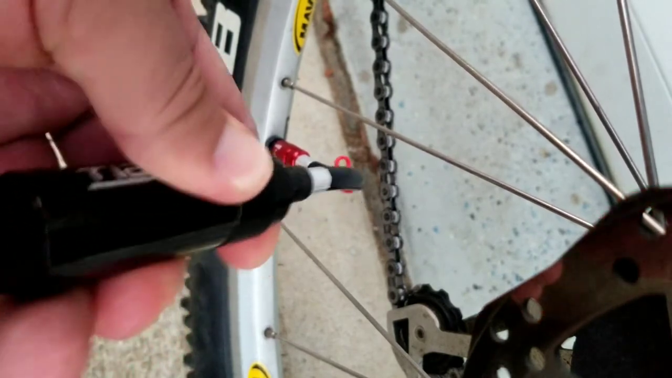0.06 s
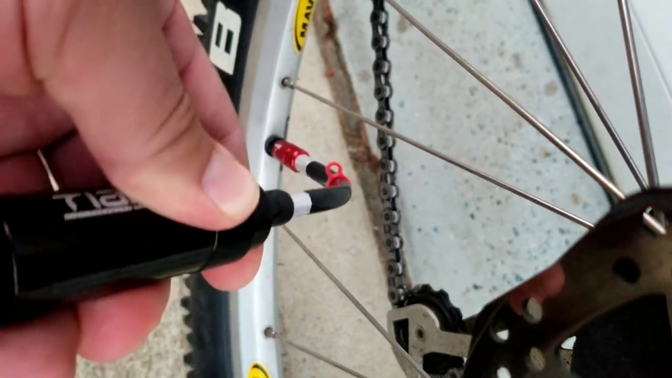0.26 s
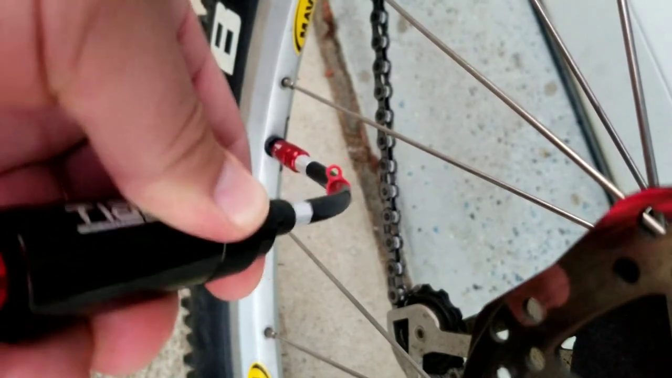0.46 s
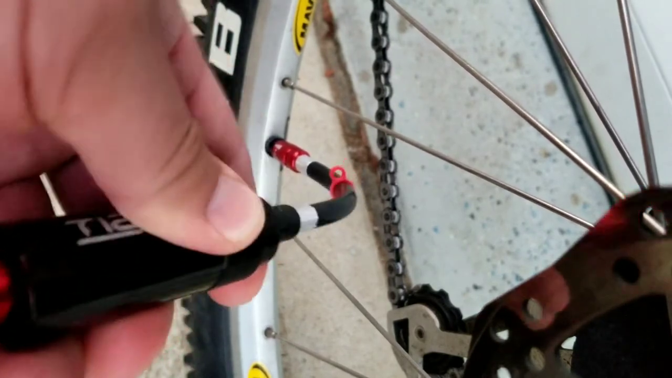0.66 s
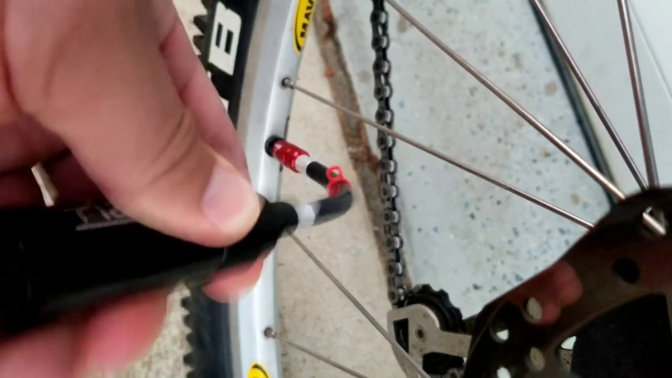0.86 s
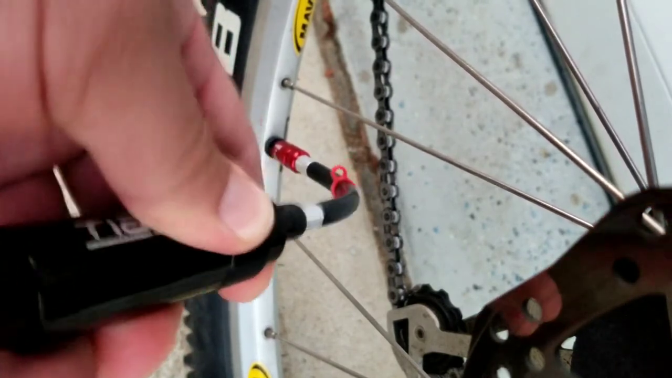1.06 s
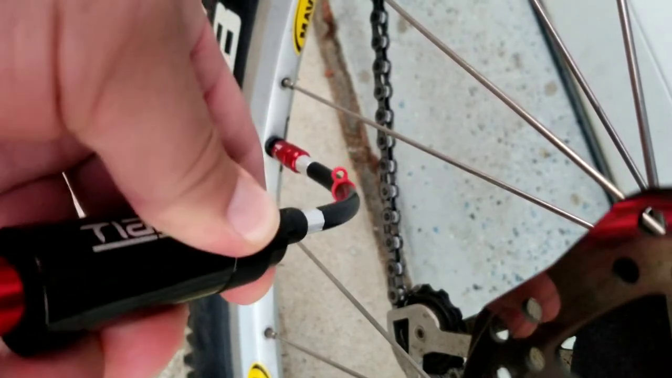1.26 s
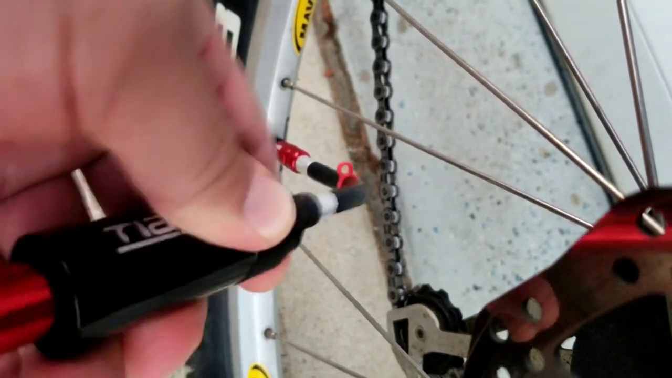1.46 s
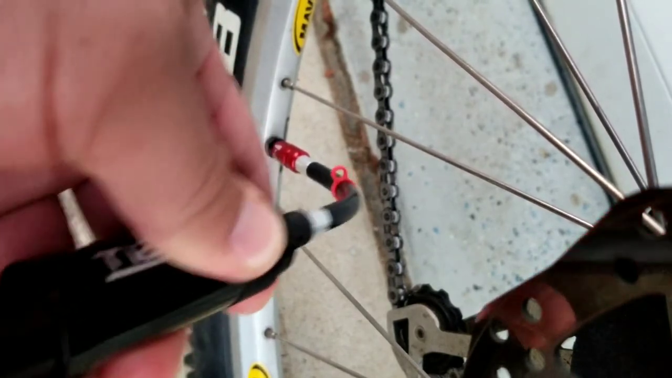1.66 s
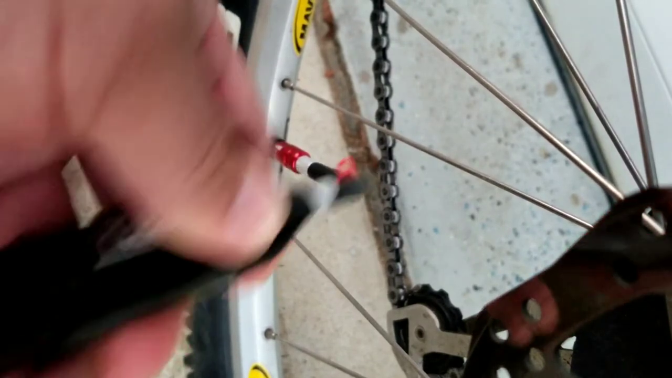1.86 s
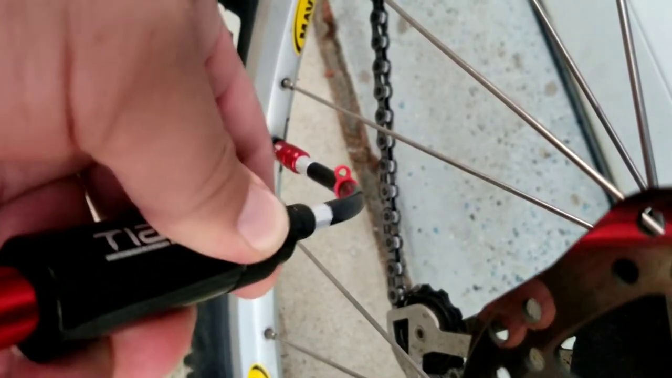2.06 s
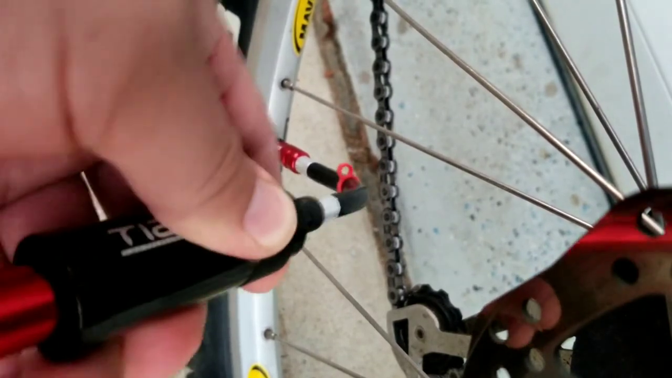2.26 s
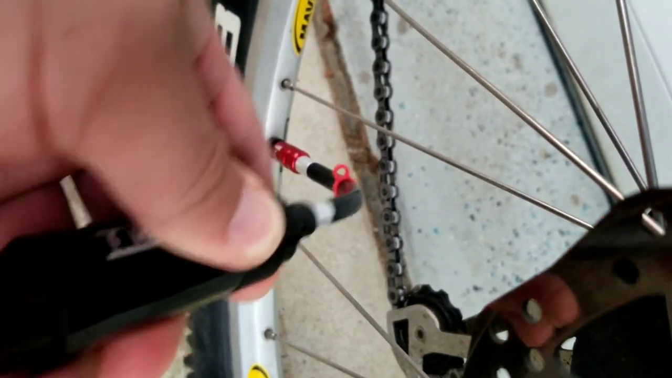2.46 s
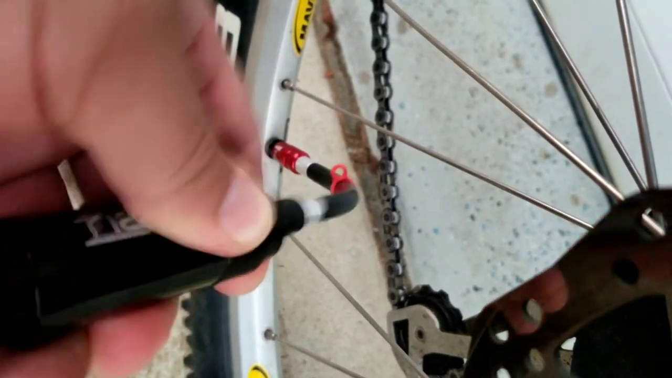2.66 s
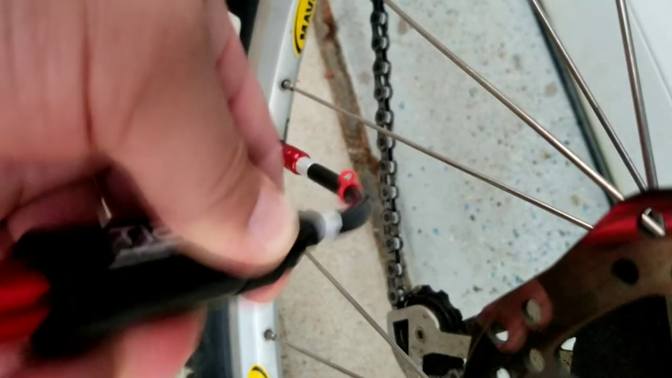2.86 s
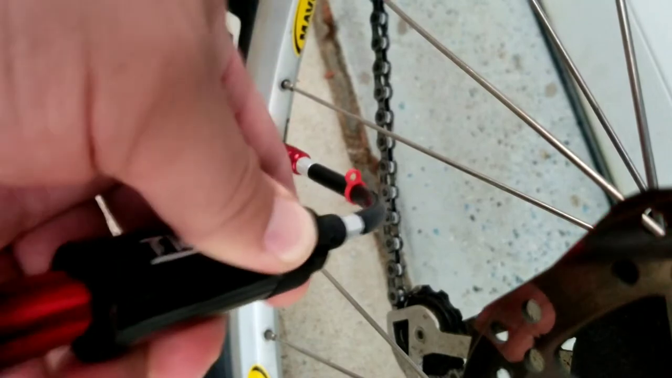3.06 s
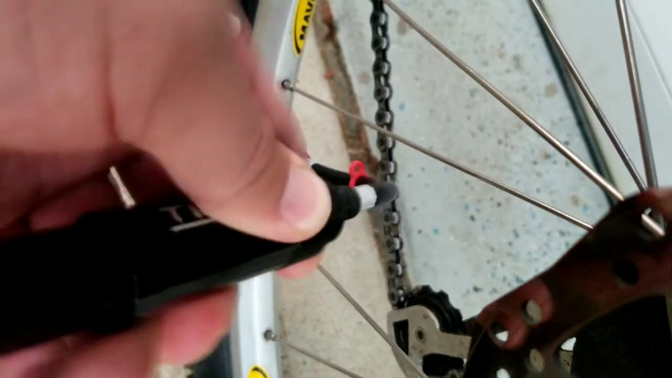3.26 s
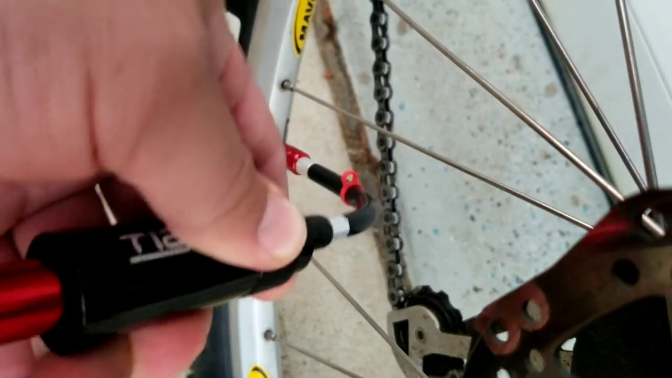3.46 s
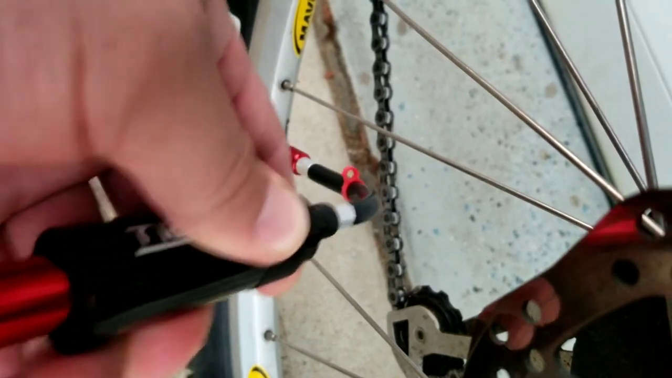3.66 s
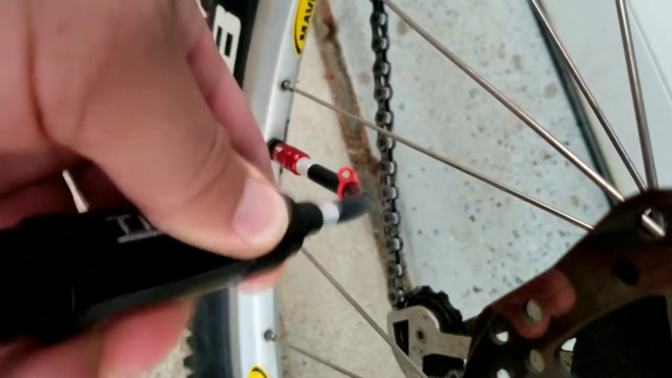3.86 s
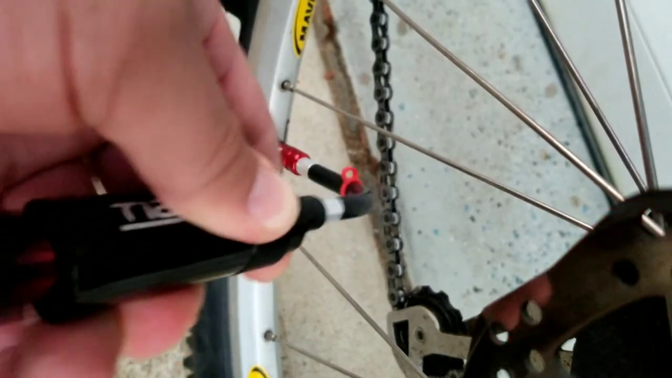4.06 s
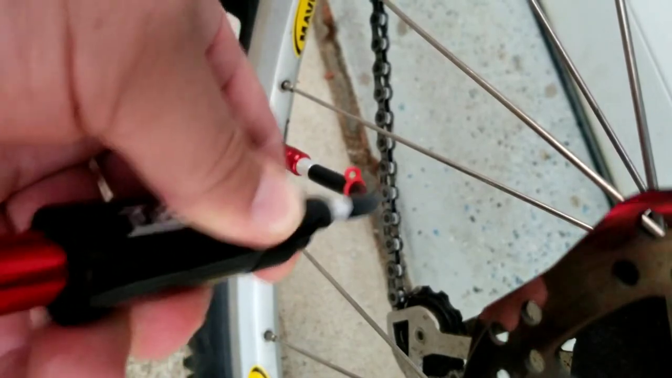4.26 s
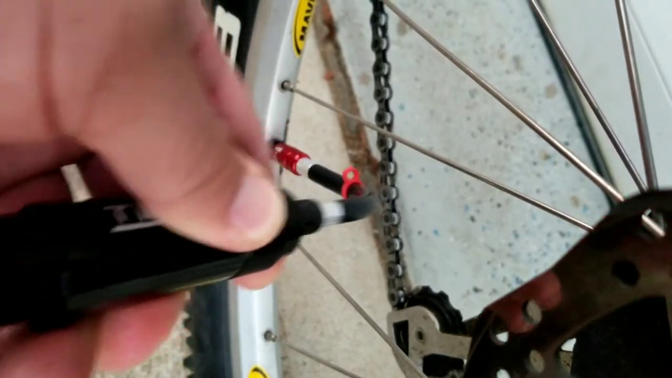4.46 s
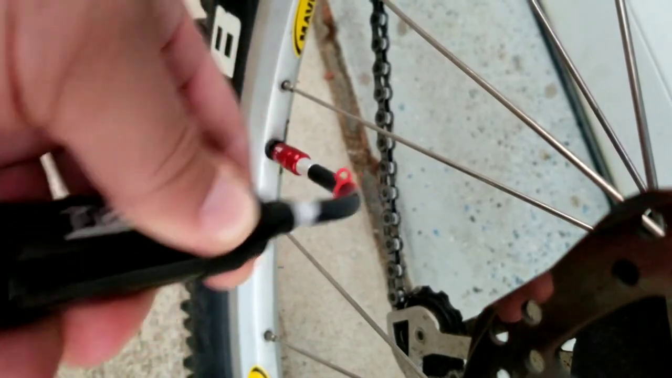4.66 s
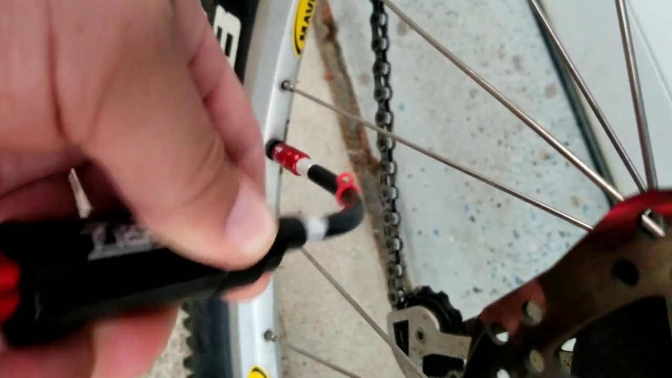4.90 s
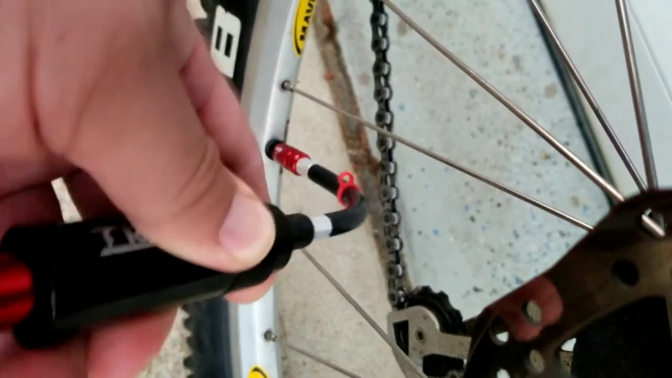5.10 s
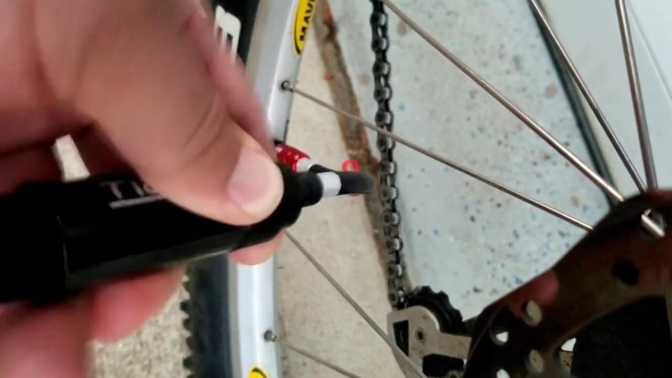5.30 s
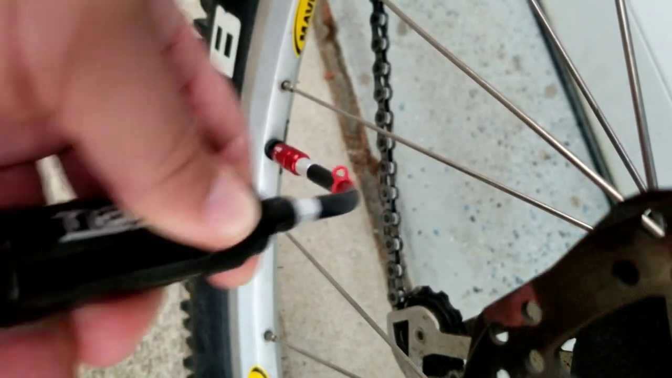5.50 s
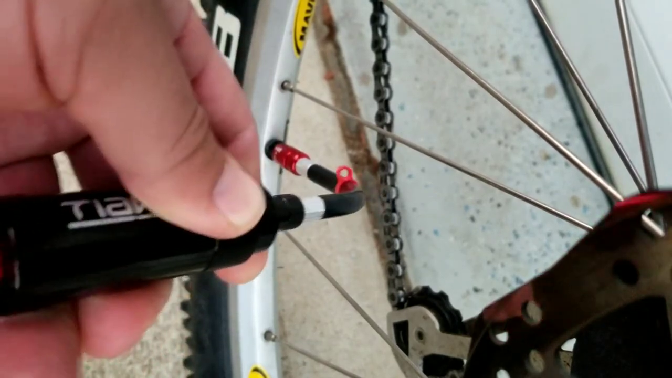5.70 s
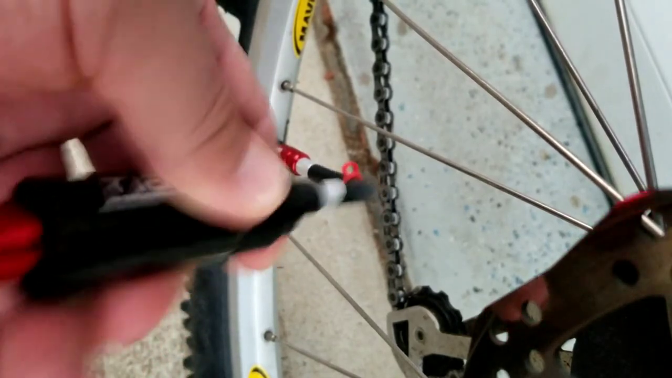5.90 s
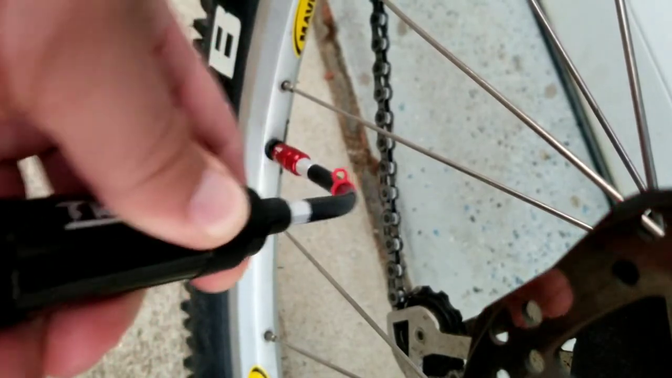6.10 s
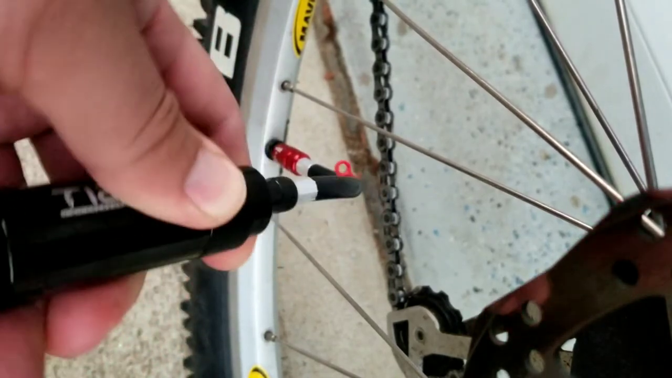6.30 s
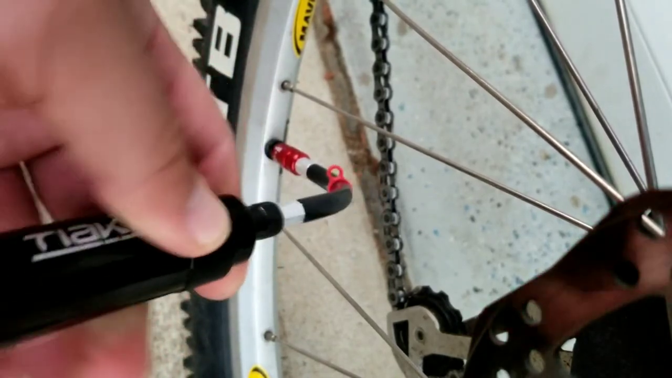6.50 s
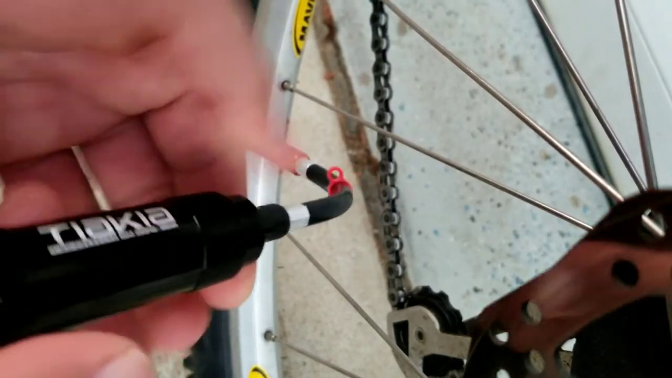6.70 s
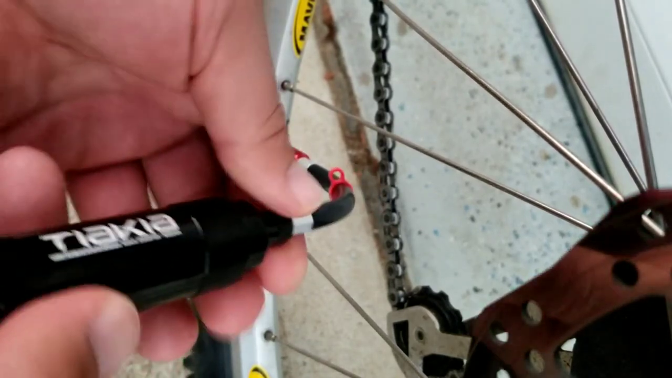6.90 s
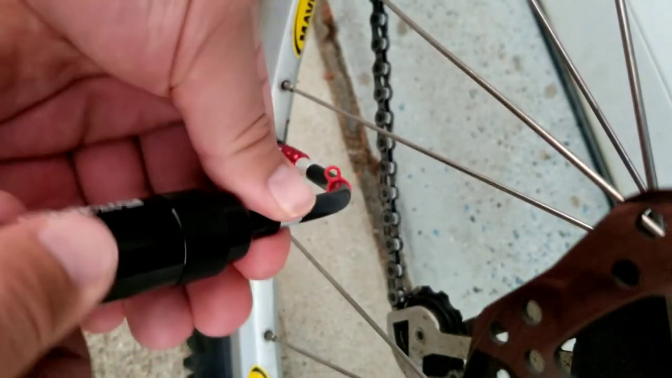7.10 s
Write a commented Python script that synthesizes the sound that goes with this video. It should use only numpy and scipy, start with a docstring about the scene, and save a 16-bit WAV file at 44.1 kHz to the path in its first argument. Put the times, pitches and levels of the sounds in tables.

```python
"""A small hand pump fills a bicycle tyre outdoors, close to a two-port microphone.
Traffic, a hum, a drone and open air lie behind it all; the hum climbs, then sinks near the end.
It begins with a push: air bursts past a fluttering rubber valve, with a chirp that mostly falls.
Most pulls that follow begin with a rising chirp, then air is drawn in with a soft hiss.
The seal rubs and at times squeaks before a next burst; knocks and dry ticks mark the strokes."""
import sys
import numpy as np
from scipy import signal
from scipy.fft import rfft, irfft, next_fast_len
from scipy.io import wavfile
from scipy.ndimage import uniform_filter1d, map_coordinates

SR = 44100
rng = np.random.default_rng(int(sys.argv[2]) if len(sys.argv) > 2 else 0)


def waveform_to_disk(signal):
    """Save audio, clipped to [-1, 1], as 16-bit WAV at the path in sys.argv[1]."""
    frames = np.transpose(np.atleast_2d(signal))
    scaled = np.clip(frames, -1, 1) * 32767
    samples = np.round(scaled).astype(np.int16)
    wavfile.write(sys.argv[1], SR, samples)


N = 315094
TIME = np.arange(N) / SR
TOP_HZ = 14700  # upper edge of the sound

# Levels in the tables are starting levels: the functions may still shift or balance them.
# distant traffic and open air: (time [s], traffic level [dB], open air level [dB])
DISTANCE = [(0, -51.5, -52.5), (.6, -56, -58), (1.2, -52, -55.5), (2.0, -51, -56.5), (2.9, -48, -56),
            (3.4, -49.5, -55), (4.2, -52.5, -58), (4.8, -51.5, -56), (5.3, -50, -57), (5.8, -53, -58.5),
            (6.4, -51.5, -59), (7.14, -54.5, -57.5)]
# a distant motor: (time [s], pitch [Hz], level [dB])
MOTOR_HUM = [(0, 83.64, -65), (2.6, 84.3, -58), (3.3, 87.8, -59.5), (3.7, 90.66, -59), (4.1, 107, -52.5),
             (4.9, 106, -65), (5.2, 101.2, -49.5), (5.5, 100, -46), (5.9, 99.33, -48), (6.3, 93.8, -56),
             (6.6, 90, -70)]
# a higher drone: (time [s], pitch [Hz], level [dB])
HIGH_DRONE = [(1.5, 240, -71), (2.7, 249.7, -64.5), (3.8, 242.9, -63.5), (4.7, 236.1, -62.5),
              (5.5, 208, -65), (6.4, 204.7, -82)]
# tone colour of the traffic: (frequency [Hz], level [dB])
TRAFFIC_COLOUR = [(20, -34), (35, -12.5), (55, -3.5), (85, 1), (120, -2.5), (190, -12.5), (245, -16),
                  (290, -27.5), (420, -44), (800, -64.5)]
# tone colour of the open air: (frequency [Hz], level [dB])
AIR_COLOUR = [(110, -17.5), (190, -9), (250, -7.5), (330, -6), (520, -5.5), (850, -0.5), (1300, -3.5),
              (2000, -8), (3000, -16), (4000, -20.5), (6500, -21.5), (8500, -40.5), (10500, -34),
              (12500, -21), (14500, -26)]
# how alike noise is on the left and right: (frequency [Hz], likeness [0-1])
LEFT_RIGHT_LIKENESS = [(60, 0.5), (150, .75), (300, 0.7), (700, 0.1), (1500, 0)]

# the seal rubs along the barrel: (start [s], length [s], level [dB])
RUB_TIMES = [(.64, 0.26, -51), (1.52, 0.25, -54.5), (1.97, 0.1, -43), (2.32, 0.24, -53.5), (3.05, 0.2, -50),
             (3.7, 0.23, -52.5), (4.35, .235, -52.5), (5.07, 0.19, -51.5), (5.91, 0.21, -51),
             (6.42, 0.085, -58.5)]
RUB_ATTACK_S, RUB_GROWTH_DB_PER_S, RUB_RELEASE_S = 0.14, 12, 0.011
LEAK_DB = -3.5  # air that leaks past the seal during a rub
# tone colour of the rubbing: (frequency [Hz], level [dB])
RUB_COLOUR = [(1500, -15.5), (3000, -11.5), (4200, -3), (5400, -9), (6500, -0.5), (7300, 1), (8300, -18.5),
              (10500, -36), (12000, -4.5), (14500, -20)]
# air is drawn into the barrel: (start [s], length [s], level [dB])
DRAW_TIMES = [(.33, 0.19, -44.5), (1.22, 0.2, -43.5), (2.04, .15, -43.5), (2.8, .15, -40),
              (3.47, 0.16, -43), (4.13, .155, -43.5), (4.82, 0.17, -44), (5.59, 0.22, -44.5)]
DRAW_ATTACK_S, DRAW_GROWTH_DB_PER_S, DRAW_RELEASE_S = 0.066, -5.5, 0.016
DRAG_DB, DRAG_GROWTH_DB_PER_S = -7.5, -40  # the seal's rubbing during a draw
# tone colour of the drawn air: (frequency [Hz], level [dB])
DRAW_COLOUR = [(2000, -18), (4200, -10.5), (5600, -13), (7200, -12), (8600, -30.5), (10500, -10),
               (12000, -1), (13200, 2), (14600, -3.5)]
# the seal squeaks: (start [s], length [s], first pitch [Hz], last pitch [Hz], level [dB])
SEAL_SQUEAKS = [(0.828, 0.057, 6400, 7240, -39.5), (1.281, 0.019, 5300, 5440, -35.5),
                (1.318, 0.033, 5750, 5550, -38), (3.562, 0.03, 5980, 5700, -40),
                (3.745, 0.026, 6410, 7200, -46.5), (4.226, 0.019, 6320, 6260, -37.5),
                (4.396, 0.027, 6270, 7340, -44.5), (5.213, 0.056, 6630, 7430, -44)]

# the piston meets a stop: (time [s], level [dB])
STOP_KNOCKS = [(.087, -25), (.5462, -46), (0.9912, -27), (1.3964, -38.5), (1.84, -24), (2.2032, -35.5),
               (2.6484, -42), (2.974, -42.5), (3.323, -25.5), (3.9905, -27), (4.653, -24.5),
               (5.0098, -41.5), (5.3691, -30.5), (5.8066, -32.5), (6.2311, -28)]
# ring of the barrel after a knock: (frequency [Hz], level [dB], time to fade by 60 dB [s])
BARREL_RING = [(1109, -4, 0.1765), (1249, 0.5, 0.11), (1426, -1.5, 0.099), (1614, -6, 0.2),
               (2150, -6, 0.17), (3843, -6, 0.0067)]
# tone colour of a knock's crack: (frequency [Hz], level [dB])
CRACK_COLOUR = [(300, -44), (700, -27), (1300, 2), (2200, -3), (3800, -1.5), (6000, -12.5), (10000, -16)]
# the check valve snaps: (time [s], level [dB])
VALVE_TICKS = [(0.5454, -29), (0.8849, -15.5), (1.3968, -23.5), (1.8845, -26.5), (2.974, -35.5),
               (3.18, -34.5), (3.324, -15), (3.3646, -32.5), (4.019, -36.5), (4.6848, -20), (5.008, -27.5),
               (5.806, -28), (6.6388, -30.5)]

# tone colour of the pump body: (frequency [Hz], level [dB])
BODY_COLOUR = [(300, -27.5), (1200, -5), (2200, -8.5), (3000, -7), (4300, -3), (5100, -2.5), (6000, -14),
               (7300, 1.5), (8500, -13.5), (9900, -16.5), (11000, -12), (12300, 0), (13300, -2.5),
               (14600, -9.5)]
# tone colour of the pump at the right port: (frequency [Hz], level [dB])
RIGHT_PORT_COLOUR = [(1200, -0.5), (3000, -14.5), (4300, -18), (5000, -17.5), (6100, -8.5), (7300, -16.5),
                     (8500, -8), (9500, -16.5), (11500, -3), (12300, -6.5), (14000, -3.5)]
# tone colour of the air jet: (frequency [Hz], level [dB])
JET_COLOUR = [(250, -38), (700, -20.5), (2300, -7.5), (3600, 1), (7000, 8.5), (14000, 4)]
# tone colour of the valve lip: (frequency [Hz], level [dB])
LIP_COLOUR = [(1200, -6), (2200, 8.5), (3300, -10.5), (4300, 8.5), (14000, 10)]
# bursts that end a push: (start [s], rise to the crest [s], length [s], crest level [dB],
# fade [dB/s], first pitch [Hz], last pitch [Hz], glide delay [power of time], flutter share [0-1],
# low resonance [dB], middle resonance [dB], right side [dB], detuning of the lip's edges [0-1])
PUSH_BURSTS = [(0, 0.0015, 0.093, -18, 110, 2254, 2098, .3, 0.51, 2, -4, -0.5, 0.051),
               (.885, .022, 0.11, -11.5, 161, 4470, 1954, 1.03, 1, -2.5, -2.5, .5, .05),
               (1.779, 0.012, 0.059, -15.5, 85.6, 4110, 2877, 1.32, 0.76, -2, -3.5, 4.5, .12),
               (2.57, 0.037, 0.08, -22, 160, 4190, 1732, 1.53, 0.7, 2.5, 2, 5, .1),
               (3.265, 0.032, 0.058, -14.5, 170, 4110, 3020, 2.6, 0.6, -5.5, 1, 2.5, 0.15),
               (3.908, 0.017, 0.08, -12, 140, 4250, 2700, 2.4, 0.82, -4.5, -1.5, 0, 0.073),
               (4.586, .008, .066, -17.5, 91, 3950, 2200, 1.8, .6, -2, 1, 1.5, .11),
               (5.275, 0.015, 0.091, -18, 96.5, 4135, 3100, 3.4, 0.84, -6, 1, 6, 0.074),
               (6.128, 0.025, 0.1, -18, 35, 3860, 2490, 3.5, 0.61, -6.5, -2.5, 6, 0.041)]
# bursts that begin a pull: (start [s], rise to the crest [s], length [s], crest level [dB],
# fade [dB/s], first pitch [Hz], last pitch [Hz], glide delay [power of time], flutter share [0-1],
# low resonance [dB], middle resonance [dB], right side [dB])
PULL_BURSTS = [(0.237, .1, .145, -13.5, 25, 1300, 4196, 2.6, 0.9, 3, -1, 1),
               (1.21, 0.02, 0.043, -12, 25, 3600, 4320, 1.15, 0.64, -0.5, 0.5, -1.5),
               (2.78, .006, 0.059, -21, 25, 2900, 4510, 1.15, .53, -5.5, -1.5, 6),
               (3.448, 0.031, 0.067, -11.5, 160, 2745, 4940, 1.4, 1, 0.5, 4.5, 5),
               (4.068, 0.09, 0.11, -13.5, 303, 1100, 5000, 1.8, 1, -1, 0, 5.5),
               (4.756, .083, 0.11, -13, 191, 997, 4930, 1.6, 0.96, -1.5, 0.5, 5.5),
               (5.514, 0.0094, 0.013, -33, 100, 2400, 2400, 1, .12, 0, 3.5, -2),
               (5.564, 0.035, 0.061, -12.5, 120, 2850, 3850, 1.5, .8, 4, 5, 1.5),
               (6.55, .018, 0.025, -27.5, 200, 1800, 1850, 1, .16, 6, 4, 3.5)]
# how fast the valve opens and the flow builds up
PUSH_ATTACK_S, PUSH_SWELL_DB_PER_S = 0.0028, 341
PULL_ATTACK_S, PULL_SWELL_DB_PER_S = 0.0099, 319.5


def amp(db):
    """Turn decibels into a gain."""
    return 10 ** (np.asarray(db) / 20)


def unit(x):
    """Scale to an average (rms) strength of 1."""
    return x / np.sqrt(np.mean(x ** 2) + 1e-20)


def along(points, hz):
    """Read a curve of (frequency, value) points, with frequency on a log axis."""
    f, v = np.transpose(points)
    return np.interp(np.log(hz + 1), np.log(f + 1), v)


def curves(rows):
    """Give one value per sample for each column after the time."""
    s, *columns = np.transpose(rows)
    return [np.interp(TIME, s, column) for column in columns]


def wobble(rate, size=N):
    """A random curve that drifts smoothly between rate points a second."""
    points = rng.standard_normal(int(size * rate / SR) + 4)
    return map_coordinates(points, [np.arange(size) * rate / SR])


def filtered(x, response):
    """Change the strength (and timing) of each frequency in x."""
    size = x.shape[-1]
    padded = next_fast_len(size + 4096)
    spectrum = rfft(x, padded) * response(np.fft.rfftfreq(padded, 1 / SR))
    return irfft(spectrum, padded)[..., :size]


def coloured(x, colour):
    """Give x a tone colour of (frequency, level) points."""
    return filtered(x, lambda hz: amp(along(colour, hz)))


def noise(colour):
    """Stereo noise of rms 1, partly alike in the bass and unrelated in the treble."""
    def mid_and_side(hz):
        turn = np.arccos(np.clip(along(LEFT_RIGHT_LIKENESS, hz), -1, 1)) / 2
        return amp(along(colour, hz)) * [np.cos(turn), np.sin(turn)]

    mid, side = filtered(rng.standard_normal((2, N)), mid_and_side)
    return unit(np.array([mid + side, mid - side]))


def add(track, s, sound):
    """Mix a sound into a track at s seconds."""
    part = track[..., max(0, round(s * SR)):][..., :sound.shape[-1]]
    part += sound[..., :part.shape[-1]]


def flutter(hz, jitter, shimmer_db, slope_db=-1, count=6):
    """A tone of count harmonics, unsteady in pitch and strength."""
    size = len(hz)
    phase = 2 * np.pi * np.cumsum(hz * (1 + jitter * wobble(1400, size))) / SR
    tone = np.zeros(size)
    for k in range(1, count + 1):
        level = slope_db * k + shimmer_db * wobble(260, size) + 1.9 * wobble(45, size)
        tone += amp(level) * (k * hz < TOP_HZ) * np.sin(k * phase)
    return unit(tone)


def gate(t, length, attack, release):
    """Opens over the attack, holds, and dies away after the length."""
    return np.minimum(t / attack, 1) * np.exp(-np.maximum(t - length, 0) / release)


def far_port(x, lag_ms=0.48):
    """The right port hears the pump later and shaded by the hand."""
    def response(hz):
        delay = np.exp(-2j * np.pi * hz * lag_ms / 1e3)
        return amp(along(RIGHT_PORT_COLOUR, hz)) * delay

    return filtered(x, response)


def background(pump, air_db=5.0, turn_down_db=-12):
    """Traffic, a motor, a drone and open air; the air layer is turned down while the pump is loud."""
    traffic_db, open_air_db = curves(DISTANCE)
    motor_hz, motor_db = curves(MOTOR_HUM)
    motor_phase = 2 * np.pi * np.cumsum(motor_hz * (1 + .012 * wobble(21))) / SR
    motor = amp(motor_db + wobble(5.3)) * unit(np.sin(motor_phase))
    drone_hz, drone_db = curves(HIGH_DRONE)
    drone = amp(drone_db) * flutter(drone_hz, jitter=.06, shimmer_db=3.0, count=1)
    traffic = amp(traffic_db) * noise(TRAFFIC_COLOUR)
    low = (traffic + motor) * amp([[-7], [3]]) + drone  # left, right [dB]
    # loudness of the pump on the left over the last 900 samples (about 20 ms)
    loudness = np.sqrt(np.abs(signal.lfilter(np.ones(900) / 900, 1, pump[0] ** 2)))
    turn_down = turn_down_db * loudness / (loudness + amp(-27))
    air = amp(open_air_db + air_db + turn_down + 1.1 * wobble(14)) * noise(AIR_COLOUR)
    return low + air * amp([[1.2], [-1.2]])


def yard(x, t60=0.11, size=8000):
    """Wheel, ground and wall return a short diffuse tail."""
    t = np.arange(size) / SR
    tail = rng.standard_normal((2, size)) * amp(-60 * t / t60) * (1 - np.exp(-t / 0.018))
    # the left side of the sound feeds both sides of the tail
    return signal.fftconvolve(x[:1], tail / np.linalg.norm(tail[0]), axes=1)[:, :N]


def slides(rows, attack, growth, release):
    """Gain of the slides: each rises, drifts steadily in dB a second, and dies away."""
    gain, t = np.zeros(N), np.arange(SR // 2) / SR
    for start, length, db in rows:
        level = db + growth * (np.minimum(t, length) - length / 2)
        add(gain, start, amp(level) * gate(t, length, attack, release))
    return gain


def piston(rub_db=-2, whistle_db=-6, whistle_hz=6300, rise_hz_per_db=55, unsteady_db=1.5, rest_db=-68):
    """The rubbing seal hisses and whistles, higher when stronger; air is drawn in behind it."""
    pushing = slides(RUB_TIMES, RUB_ATTACK_S, RUB_GROWTH_DB_PER_S, RUB_RELEASE_S)
    dragging = slides(DRAW_TIMES, DRAW_ATTACK_S, DRAG_GROWTH_DB_PER_S, DRAW_RELEASE_S)
    friction = pushing + amp(DRAG_DB) * dragging + amp(rest_db)
    friction_db = 20 * np.log10(friction) + unsteady_db * wobble(14)
    pitch = whistle_hz + rise_hz_per_db * (friction_db + 60)
    whistle = flutter(pitch, jitter=0.055, shimmer_db=4.5, count=1)
    rub = amp(rub_db) * noise(RUB_COLOUR) + amp(whistle_db) * whistle
    rubbing = amp(friction_db + 0.83 * wobble(60)) * rub * amp([[0], [-11]])
    flow = slides(DRAW_TIMES, DRAW_ATTACK_S, DRAW_GROWTH_DB_PER_S, DRAW_RELEASE_S)
    flow = flow + amp(LEAK_DB) * pushing
    drawing = flow * amp(1.2 * wobble(96)) * noise(DRAW_COLOUR) * amp([[0], [-5.5]])
    return rubbing + drawing


def squeaks(jitter=.006):
    """The seal sings briefly as it slides, as a single gliding tone."""
    out = np.zeros(N)
    for s, length, first_hz, last_hz, db in SEAL_SQUEAKS:
        size = int(length * SR)
        hz = np.linspace(first_hz, last_hz, size) * (1 + jitter * wobble(900, size))
        swell = np.sqrt(np.hanning(size).clip(0))
        add(out, s, amp(db) * swell * np.sin(2 * np.pi * np.cumsum(hz) / SR))
    return np.array([out, far_port(out)])


def knocks(ring_db=-8.5, crack_db=3, hardness=1.0):
    """A stop cracks and rings the barrel; the hand keeps the ring weaker, for its level, on hard stops."""
    out, t = np.zeros((2, N)), np.arange(SR // 6) / SR
    impact = amp(-60 * t / .017) * np.minimum(t / .0004, 1)
    for s, db in STOP_KNOCKS:
        ring = np.zeros((2, len(t)))
        for hz, level, t60 in BARREL_RING:
            fade = amp(level + rng.normal(0, 1.9) - 60 * t / t60)
            start_phase = rng.uniform(0, np.pi, (2, 1))
            phase = 2 * np.pi * hz * rng.normal(1, 0.015) * t + wobble(330, len(t)) + start_phase
            ring += fade * np.sin(phase)
        ring *= 1 - np.exp(-t / 0.00085)
        # hard stops crack; soft ones mostly ring
        crack = unit(coloured(rng.standard_normal((2, len(t))), CRACK_COLOUR))
        crack = crack * impact * amp(hardness * (db + 26.0))
        add(out, s, amp(db) * (amp(ring_db - 0.5 * (db + 35)) * ring + amp(crack_db) * crack))
    return out * amp([[.5], [-.5]])


def ticks(tick_db=-3, t60=0.013):
    """The check valve seats with a small dry snap: a very short piece of coloured noise."""
    out, t = np.zeros(N), np.arange(SR // 20) / SR
    colour = [(300, -42.0), (700, -20.5), (1500, -13.5), (4100, -1.0),
              (5600, -10.5), (7200, -0.5), (9000, -20.5), (12500, -8.0)]  # (frequency [Hz], level [dB])
    for s, db in VALVE_TICKS:
        snap = unit(coloured(rng.standard_normal(len(t)), colour))
        add(out, s, amp(db + tick_db - 60 * t / t60) * snap)
    return np.array([out, amp(-4.0) * far_port(out)])


def lip(hz, spread, edge_db, jitter=0.01, swing_db=5):
    """The edges of the valve lip flap a little faster and slower than its middle."""
    edges = np.zeros(len(hz))
    for side in (-1, 1):
        swing = amp(edge_db + swing_db * wobble(40, len(hz)))
        edges += swing * flutter(hz * (1 + side * spread), jitter, shimmer_db=3.5)
    return unit(flutter(hz, jitter, shimmer_db=2) + edges)


def two_ports(a, b, apart=1.0):
    """The right port hears part of what the left one hears, and part of its own."""
    return np.array([a, unit(a + apart * b)])


def burst(hz, db, share, low_db, middle_db, right_db, spread, edge_db, breakup, onset_db=-32, range_db=12):
    """Air breaks through the valve: the fluttering lip and a jet hiss sound through the pump body."""
    lips = two_ports(lip(hz, spread, edge_db), lip(hz, spread, edge_db))
    jets = two_ports(*rng.standard_normal((2, len(hz))) * amp(0.4 * wobble(500, len(hz))))
    # a weak flow only hisses; a strong one sets the lip fluttering
    strength = np.clip((db - onset_db) / range_db, 0, 1)
    sing = np.clip(share * strength, 0, .9)
    # where the stroke is slow (low pitch), the flutter breaks up into hiss
    sing = sing * (hz / hz.max()) ** breakup
    air = np.sqrt(sing) * coloured(lips, LIP_COLOUR) + np.sqrt(1 - sing) * coloured(jets, JET_COLOUR)
    # the grip changes how strongly each resonance speaks
    grip = [(4900, low_db), (6600, middle_db), (8600, middle_db), (11000, 0)]
    sound = coloured(coloured(air, BODY_COLOUR), grip)
    # the flow sets the loudness, whichever resonance the flutter passes
    left, right = sound / np.sqrt(np.abs(uniform_filter1d(sound ** 2, size=500)) + 1e-12)
    # as the pump sways to the right, that port hears it louder and sooner
    lag_ms = np.clip(.42 - 0.0664 * right_db, 0, .46)
    right = amp(right_db) * far_port(right, lag_ms)
    return np.array([left, right]) * amp(db)


def valve_open(length, tail=.011):
    """Times since a burst began, and its progress from 0 to 1."""
    t = np.arange(int((length + tail) * SR)) / SR
    return t, np.minimum(t / length, 1)


def crest_shape(t, crest, swell, fade):
    """Level in dB: up to the crest and down again at steady rates."""
    return np.minimum(swell * (t - crest), fade * (crest - t))


def pulls(release=0.003):
    """A pull opens the valve gently; the flutter mostly climbs and levels off as the piston gains speed."""
    out = np.zeros((2, N))
    for start, rise, length, db, fade, first_hz, last_hz, delay, *settings in PULL_BURSTS:
        t, progress = valve_open(length)
        hz = last_hz + (first_hz - last_hz) * (1 - progress ** delay) ** 2
        level = db + crest_shape(t, rise, PULL_SWELL_DB_PER_S, fade)
        sound = burst(hz, level, *settings, spread=.07, edge_db=-5.5, breakup=0.97)
        add(out, start, gate(t, length, PULL_ATTACK_S, release) * sound)
    return out


def pushes(release=0.0052):
    """A push pops the valve open; as the piston slows, the flutter falls, mostly ever faster."""
    out = np.zeros((2, N))
    for start, rise, length, db, fade, first_hz, last_hz, delay, *settings in PUSH_BURSTS:
        t, progress = valve_open(length)
        hz = first_hz + (last_hz - first_hz) * progress ** delay
        level = db + crest_shape(t, rise, PUSH_SWELL_DB_PER_S, fade)
        sound = burst(hz, level, *settings, edge_db=-4.5, breakup=1.7)
        add(out, start, gate(t, length, PUSH_ATTACK_S, release) * sound)
    return out


def scene():
    """The pump with its short echo, in front of the distance."""
    pump = piston() + squeaks() + knocks() + ticks() + pulls() + pushes()
    return background(pump) + amp([[-21], [-24]]) * yard(pump) + pump


def record(dry):
    """Cuts the sound off steeply above its upper edge."""
    return filtered(dry, lambda hz: 1 / np.sqrt(1 + (hz / TOP_HZ) ** 200))


dry = scene()
out = record(dry)
waveform_to_disk(out)
```